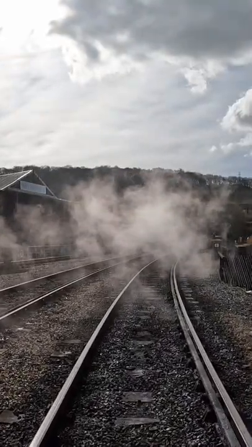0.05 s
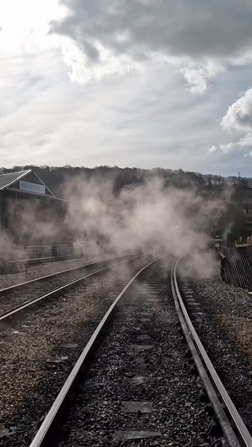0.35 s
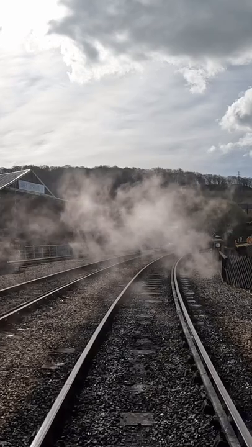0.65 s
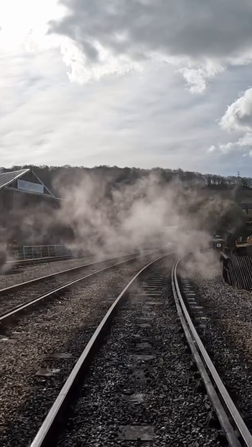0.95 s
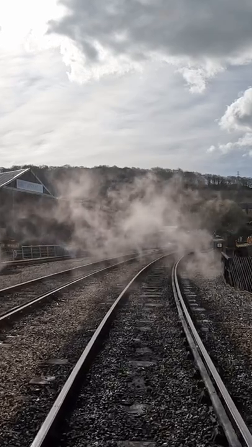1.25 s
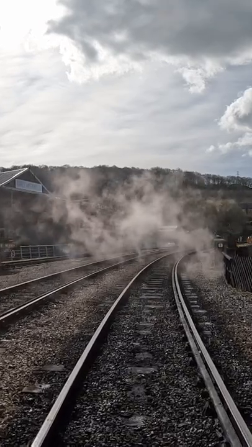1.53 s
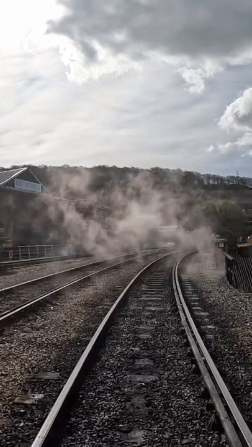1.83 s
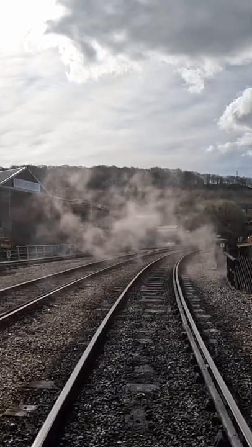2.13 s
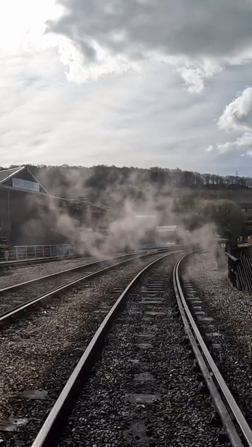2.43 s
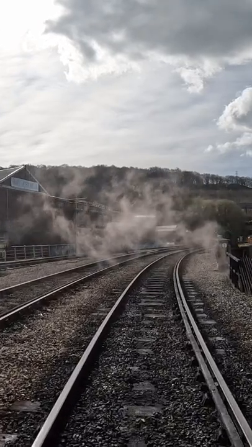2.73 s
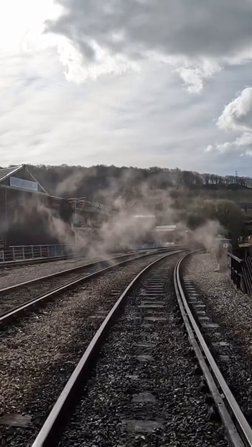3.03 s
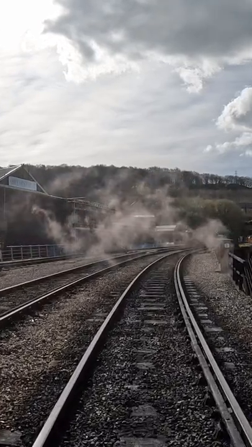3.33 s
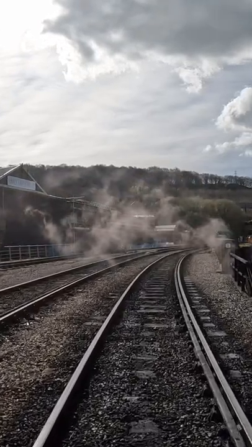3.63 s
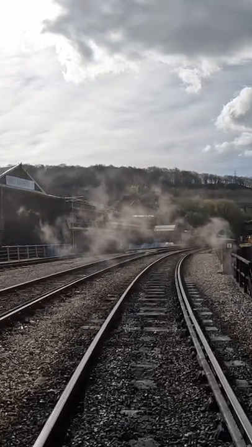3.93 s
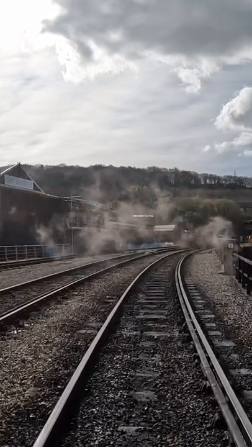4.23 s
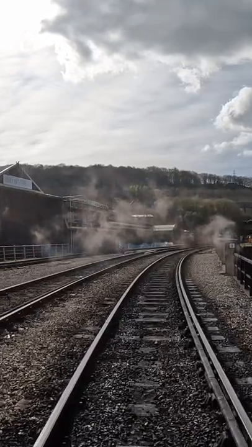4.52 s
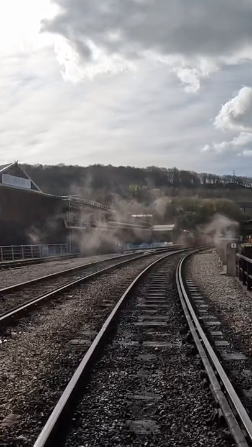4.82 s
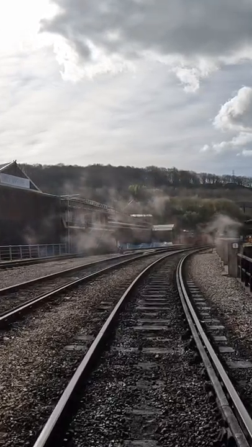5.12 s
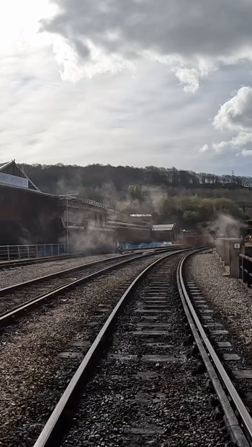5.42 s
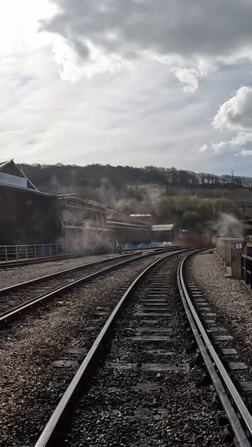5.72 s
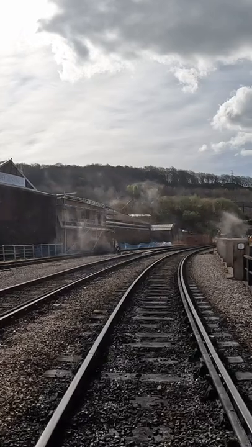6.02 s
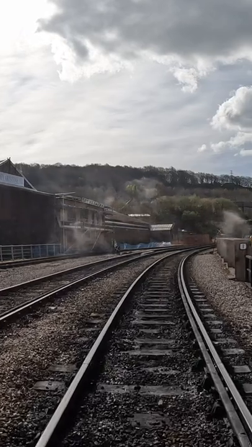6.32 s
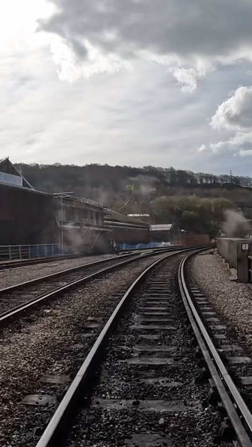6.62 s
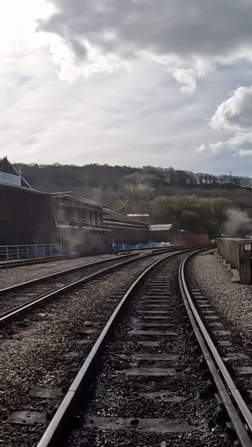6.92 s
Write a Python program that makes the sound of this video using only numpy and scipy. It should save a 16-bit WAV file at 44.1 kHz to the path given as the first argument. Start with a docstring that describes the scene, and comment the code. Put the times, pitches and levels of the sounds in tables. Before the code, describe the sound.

A steam locomotive moves slowly off, heard in stereo from on board. A heavy exhaust chuff sounds right at the start, and more follow at about 1.2, 2.4, 3.5, 4.6, 5.5 and 6.4 seconds, gradually quickening. Each is a short, breathy bark and roar with a hollow boom from the chimney, followed by a deep heave underfoot. Much weaker, duller puffs fall between the beats, at about 0.7, 2.0, 3.2, 4.2, 5.2 and 6.1 seconds. Two brief, bright spits of steam come close to the microphones at around 3.9 and 4.1 seconds. Throughout, the wheels rumble low on the rails and leaking steam gives a thin, faintly whistling hiss, strongest at the very beginning. This background sinks slightly under each chuff and swells back, continuing until the end at about 7 seconds.

```python
"""Steam locomotive pulling away

On board, on a stereo pair of microphones, as the engine moves slowly off at about one beat a second.
Each exhaust beat barks, roars and booms in the chimney, with a weak puff in between. Steam spits
close by and leaks steadily; the frame and the wheels rumble underneath. The recorder's limiter
ducks under the beats, so the hiss sinks and then swells back."""
import sys
import numpy as np
from scipy import signal
from scipy.fft import rfft, irfft, next_fast_len
from scipy.io import wavfile
from scipy.ndimage import uniform_filter1d

SR = 44100
rng = np.random.default_rng(int(sys.argv[2]) if len(sys.argv) > 2 else 0)


def master(y):
    """Save y as 16-bit WAV."""
    cut = np.clip(np.atleast_2d(y).T, -1, 1)
    pcm = np.round(cut * 32767)  # scale
    wavfile.write(sys.argv[1], SR, pcm.astype(np.int16))


N = 315756
TIME = np.arange(N) / SR
FFT_SIZE = next_fast_len(N, True)
FREQS = np.maximum(np.fft.rfftfreq(FFT_SIZE, 1 / SR), 1)

# exhaust beats: (time [s], valve open [s], bark [dB], roar [dB], boom [dB], smokebox [dB], jolt [dB])
BEATS = [(-.035, .23, -31, -33.5, -7.5, -10.5, -14.5), (1.208, .25, -29.5, -30, -7.5, -16, -12),
         (2.402, 0.22, -40, -31, -9, -13, -18), (3.488, .205, -35, -31.5, -6.5, -17, -20.5),
         (4.563, 0.22, -31, -28, -7.5, -15, -17.5), (5.518, 0.2, -29.5, -26.5, -6.5, -16.5, -11),
         (6.391, 0.24, -38.5, -29.5, -8.5, -14.5, -16)]
# how each part of a beat speaks: (delay [s], attack [s], hold [share of open time], release [dB/s])
BARK_SHAPE = (-.025, 0.07, .5, 70)
ROAR_SHAPE = (-.032, .1, 0.99, 79)
BOOM_SHAPE = (0.002, .115, .97, 120)
SMOKEBOX_SHAPE = (-.02, .15, 1, 114)
# second surges of the jet within a beat: (peak time [s], half length [s], level [dB])
SURGES = [(0.15, 0.036, -28.5), (1.333, .018, -28), (2.57, 0.03, -28), (3.703, 0.029, -25),
          (6.564, 0.028, -27.5)]
# colours of the jet: (frequency [Hz], relative level [dB])
BARK_SPECTRUM = [(300, -28), (700, 1.5), (1200, -2.5), (2000, -0.5), (3200, -5), (4500, -13), (7000, -22),
                 (10000, -27), (15000, -41)]
ROAR_SPECTRUM = [(300, -33), (460, -3.5), (540, 9), (680, 1), (950, -5), (1300, -4), (1900, -11.5),
                 (2800, -20), (5000, -21.5), (15000, -56)]
# blast pipe resonances: (frequency [Hz], width [Hz], lift [dB])
BLAST_PIPE = [(528, 36, 4.5), (788, 18, 9.5), (876, 29, 9.5), (987, 70, 7.5), (1173, 34, -1),
              (1270, 29, 5.5), (1700, 110, 4), (2012, 23, 7.5), (2450, 29, 0)]
# air columns: (frequency [Hz], width [Hz], relative level [dB])
CHIMNEY_MODES = [(176.5, 18.3, 4), (276, 37, -19), (319.4, 30, -7.5), (398.4, 39, -15.5)]
SMOKEBOX_MODES = [(83, 25, 0), (118.7, 32, 0)]

def exhaust(flutter_db=1.4):
    """The valve opens with a bright bark; the jet then roars and sets chimney and smokebox booming."""
    bark, roar, boom, depth = np.zeros((4, N))
    for start, open_s, bark_db, roar_db, boom_db, smokebox_db, _ in BEATS:
        bark += from_db(bark_db) * stroke(start, open_s, BARK_SHAPE)
        roar += from_db(roar_db) * stroke(start, open_s, ROAR_SHAPE)
        boom += from_db(boom_db) * stroke(start, open_s, BOOM_SHAPE)
        depth += from_db(smokebox_db) * stroke(start, open_s, SMOKEBOX_SHAPE)
    surge = sum(from_db(level_db) * swell(peak, half) for peak, half, level_db in SURGES)
    jet = bark * turbulence(BARK_SPECTRUM, BLAST_PIPE)
    jet += np.hypot(roar, surge) * turbulence(ROAR_SPECTRUM, BLAST_PIPE)
    jet *= from_db(flutter_db * drift(rate_hz=17))  # large eddies make the jet flutter
    chimney = boom * ringing(CHIMNEY_MODES, top_hz=426, steady_s=0.042)
    smokebox = depth * ringing(SMOKEBOX_MODES, top_hz=190, steady_s=0.082)
    return jet + chimney + smokebox


# puffs between the beats: (peak time [s], half length [s], thud [dB], breath [dB])
PUFFS = [(0.733, 0.019, -23.5, -33.5), (2.004, 0.019, -22, -35), (3.163, 0.017, -31, -38.5),
         (4.173, 0.026, -27, -30.5), (5.153, 0.014, -33, -32.5), (6.111, 0.025, -19, -33)]
# resonances of the thud: (frequency [Hz], width [Hz], relative level [dB])
PUFF_MODES = [(177, 29, -9), (305, 18.4, -4.5)]

def puffs():
    """About half a beat later comes a much weaker, duller puff: a thud with a breath of steam."""
    thud = sum(from_db(thud_db) * swell(peak, half) for peak, half, thud_db, _ in PUFFS)
    breath = sum(from_db(breath_db) * swell(peak, half) for peak, half, _, breath_db in PUFFS)
    body = ringing(PUFF_MODES, top_hz=515, steady_s=0.037)
    lowpass = signal.butter(2, 1100, fs=SR, output="sos")
    dull_jet = signal.sosfilt(lowpass, turbulence(ROAR_SPECTRUM, BLAST_PIPE))
    return thud * body + breath * dull_jet


# spits of steam: (time [s], rise [s], decay [s], level [dB], low edge [Hz], high edge [Hz])
SPITS = [(3.928, 0.0085, 0.016, -26.5, 1670, 4450), (4.078, 0.011, 0.035, -33, 1340, 11000)]
# pitches the spits ring at: (frequency [Hz], width [Hz], lift [dB])
SPIT_RINGS = [(1980, 120, 7), (2620, 180, 6.5), (3750, 150, -1)]
# escaping steam, for spits and leak alike: (frequency [Hz], relative level [dB])
STEAM_SPECTRUM = [(300, -49), (1000, -3), (2200, 0), (3200, -1), (5000, -1), (6500, -3.5), (7400, -5),
                  (8400, -11), (10500, -9), (12100, -12), (13000, -21), (14100, -18), (15000, -64)]

def spits():
    """Bright spurts of steam close to the microphones start abruptly and die away."""
    hiss = turbulence(STEAM_SPECTRUM, SPIT_RINGS)
    out = 0
    for start, rise, decay, level_db, low_hz, high_hz in SPITS:
        band = signal.butter(3, [low_hz, high_hz], "band", fs=SR, output="sos")
        onset = np.clip((TIME - start) / rise, 0, 1)
        tail = np.exp(-np.maximum(TIME - start - rise, 0) / decay)
        out += from_db(level_db) * onset * tail * rms_one(signal.sosfilt(band, hiss))
    return out


# a light heave as the valve opens, a full one after the thrust:
# (delay [s], half length [s], drop below the beat's jolt [dB])
HEAVES = [(.05, 0.034, 5.5), (0.351, 0.064, 0.5)]
# sway and boom of the frame: (frequency [Hz], width [Hz], relative level [dB])
FRAME_MODES = [(23.1, 15.6, -4.5), (38.9, 4.5, 5.5)]

def frame(shudder_db=-27, waver_db=2.5):
    """The frame underfoot shudders unevenly as the wheels roll, and heaves with each piston thrust."""
    jolts = 0
    for start, *_, jolt_db in BEATS:
        for delay, half, drop_db in HEAVES:
            jolts += from_db(jolt_db - drop_db) * swell(start + delay, half)
    shudder = from_db(shudder_db + waver_db * drift(rate_hz=9))
    return np.hypot(jolts, shudder) * ringing(FRAME_MODES, top_hz=59.5, steady_s=0.042)


# wheels on the rails: (time [s], level [dB])
ROLLING_LEVEL = [(0, -24), (.55, -25.5), (.9, -23), (2.3, -25.5), (3.9, -24.5), (4.9, -24), (6, -23),
                 (6.4, -26), (7.16, -26)]
# colour of their rumble: (frequency [Hz], relative level [dB])
ROLLING_SPECTRUM = [(20, -2), (45, 3), (65, -5.5), (100, 2), (130, -11), (175, -5), (235, -16), (310, -11),
                    (420, -21), (560, -22.5), (720, -27.5), (1100, -30), (2000, -38.5), (5000, -56.5)]
# cab resonances: (frequency [Hz], width [Hz], lift [dB])
CAB_RESONANCES = [(180, 45, 4.45), (291, 13, 3.2), (413, 20, 6.1), (516, 23, 4.4), (726, 20, 7.2),
                  (955, 13, 8), (1159, 45, 7.4), (1230, 22, 7.6)]

def wheels(waver_db=0.95):
    """The wheels rumble on the rails, heard through the resonances of the cab."""
    level_db = over_time(ROLLING_LEVEL) + waver_db * drift(rate_hz=11)
    return from_db(level_db) * turbulence(ROLLING_SPECTRUM, CAB_RESONANCES)


# strength of the leak: (time [s], level [dB])
LEAK_LEVEL = [(0, -36.5), (.3, -41), (1.1, -41), (1.7, -42), (2.8, -43), (4.4, -43), (5.1, -42),
              (7.16, -43)]
# whistles in its hiss: (frequency [Hz], width [Hz], lift [dB])
LEAK_WHISTLES = [(1562, 54, 7.5), (1697, 54, 10.3), (2060, 29, 3.9), (2450, 24, 4.4), (2450, 30, 3.6),
                 (2620, 19, 6.4), (3740, 51, 4.7), (5480, 230, 5.1), (7676, 220, 9.9), (12050, 400, 4)]

def leak(waver_db=0.68):
    """Leaking steam hisses behind the beats and eases off as the engine gets going."""
    level_db = over_time(LEAK_LEVEL) + waver_db * drift(rate_hz=18)
    return from_db(level_db) * turbulence(STEAM_SPECTRUM, LEAK_WHISTLES)


def wind(level_db=-43, top_hz=26):
    """Faint moving air rumbles on each microphone separately."""
    lowpass = signal.butter(2, top_hz, fs=SR, output="sos")
    return from_db(level_db) * rms_one(signal.sosfilt(lowpass, rng.standard_normal((2, N))))


# how alike the two microphones hear flow noise: (frequency [Hz], likeness [0-1])
LIKENESS = [(100, 1), (300, 0.99), (550, 0.95), (900, 0.74), (1400, 0.48), (2100, 0.67), (3200, 0.38),
            (5000, 0.48), (6000, 0.8), (8000, 0.7), (9200, 0.36), (11000, 0.36), (13000, .08)]

def turbulence(spectrum, resonances):
    """Flow noise with narrow resonances, wider across the pair in the treble; rms 1."""
    lift_db = sum(lift / (1 + (2 * (FREQS - hz) / width) ** 2) for hz, width, lift in resonances)
    alike = np.clip(over_hz(LIKENESS), 0, 1)
    mid, side = rfft(rng.standard_normal((2, FFT_SIZE)))
    pair = np.sqrt(1 + alike) * mid + np.sqrt(1 - alike) * side * [[1], [-1]]
    return rms_one(at_microphones(pair * from_db(over_hz(spectrum) + lift_db)))


def ringing(modes, top_hz, steady_s):
    """Random pushes keep a set of low modes ringing at a steady strength."""
    ring = 0
    for hz, width, level_db in modes:
        b, a = signal.iirpeak(hz, hz / width, fs=SR)
        ring += from_db(level_db) * signal.lfilter(b, a, rng.standard_normal(FFT_SIZE + SR))
    lowpass = signal.butter(8, top_hz, fs=SR, output="sos")
    ring = signal.sosfilt(lowpass, ring)[SR:]  # the modes get a second to build up
    power = uniform_filter1d(np.abs(signal.hilbert(ring)) ** 2 / 2, int(steady_s * SR))
    return at_microphones(rfft(ring / np.sqrt(power)))


# balance across the pair: (frequency [Hz], left minus right [dB])
MIC_BALANCE = [(60, 0), (110, .15), (180, .6), (350, 1.7), (600, 3.8), (820, 6.5), (1050, 3.8), (1600, 5.2),
               (3400, 4.2), (5200, -1), (7500, 1), (10800, 3.5), (12000, 14), (13000, 8), (14600, 18)]
# phase across the pair: (frequency [Hz], left lead [rad])
MIC_PHASE = [(550, 0), (900, -0.28), (1400, -0.38), (2100, -0.64), (3200, -0.53), (4800, .45), (5900, 0.1)]

def at_microphones(spectra):
    """Spectra become a stereo signal with the level and phase differences of the two microphones."""
    half_difference = from_db(over_hz(MIC_BALANCE) / 2) * np.exp(0.5j * over_hz(MIC_PHASE))
    return irfft(spectra * np.array([half_difference, 1 / half_difference]), FFT_SIZE)[:, :N]


def stroke(start_s, open_s, shape):
    """Smooth attack, hold and release of one part of a beat; height up to 1."""
    delay_s, attack_s, hold_share, release_db_per_s = shape
    age = TIME - start_s
    opening = np.sin(np.pi / 2 * np.clip((age - delay_s) / attack_s, 0, 1)) ** 2
    return opening * from_db(-release_db_per_s * np.maximum(age - hold_share * open_s, 0))


def swell(peak_s, half_s):
    """A bell-shaped rise and fall of height 1."""
    return np.exp(-0.5 * np.minimum(((TIME - peak_s) / half_s) ** 2, 100))


def drift(rate_hz):
    """A random wander, mostly slower than rate_hz; rms 1."""
    slow = rfft(rng.standard_normal(FFT_SIZE)) / (1 + (FREQS / rate_hz) ** 2)
    return rms_one(irfft(slow, FFT_SIZE)[:N])


def over_time(points):
    """A table over time, read along straight lines."""
    return np.interp(TIME, *np.transpose(points))


def over_hz(points):
    """A table over frequency, read on a log axis."""
    hz, value = np.transpose(points)
    return np.interp(np.log(FREQS), np.log(hz), value)


def from_db(db):
    """Decibels to gain."""
    return 10 ** (np.asarray(db) / 20)


def rms_one(x):
    """Scale to an rms of 1."""
    return x / np.sqrt(np.mean(x ** 2) + 1e-20)


def scene():
    """From on board: the exhaust up front, over a bed of leaking steam and rolling wheels."""
    bed = leak() + wheels()
    return exhaust() + puffs() + spits() + frame() + wind() + bed


def record(dry, threshold_db=-10.5, detector_s=0.021, attack_s=0.017, release_db_per_s=6.5,
           peak_limit=0.76, hardness=5, cutoff_hz=15100):
    """The recorder's limiter clamps fast and lets go slowly; peaks are rounded, the top treble is cut."""
    power = uniform_filter1d(np.mean(dry ** 2, axis=0), int(detector_s * SR))
    over_db = np.maximum(10 * np.log10(power + 1e-9) - threshold_db, 0)
    release_db = release_db_per_s * TIME
    held_db = np.maximum.accumulate(over_db + release_db) - release_db
    lag = np.exp(-1 / (attack_s * SR))
    duck_db = signal.lfilter([1 - lag], [1, -lag], held_db)
    limited = dry * from_db(-duck_db)
    rounded = limited / (1 + np.abs(limited / peak_limit) ** hardness) ** (1 / hardness)
    lowpass = signal.ellip(12, 0.1, 90, cutoff_hz, fs=SR, output="sos")
    return signal.sosfilt(lowpass, rounded)


dry = scene()
out = record(dry)
master(out)
```